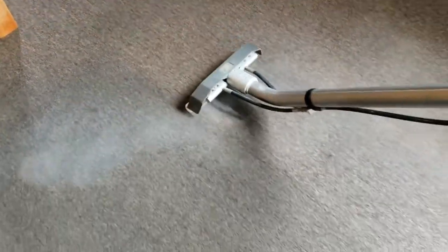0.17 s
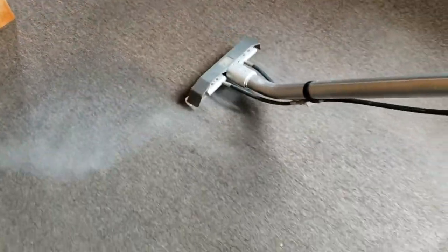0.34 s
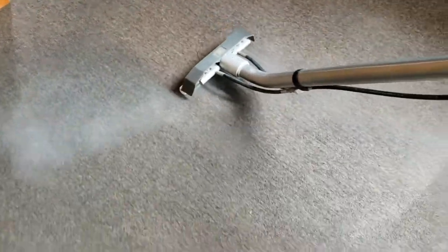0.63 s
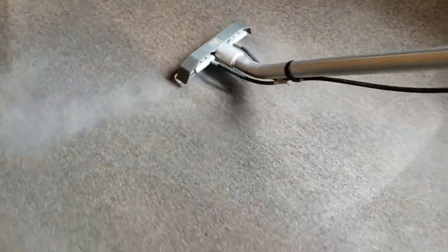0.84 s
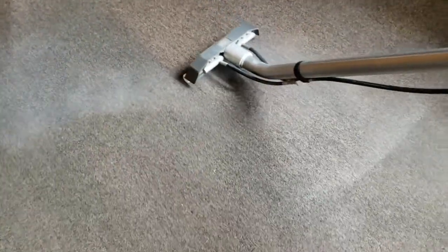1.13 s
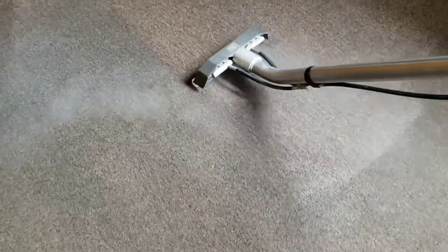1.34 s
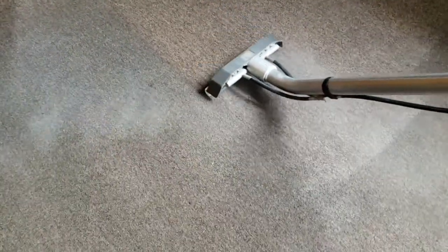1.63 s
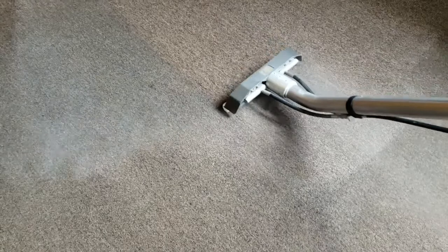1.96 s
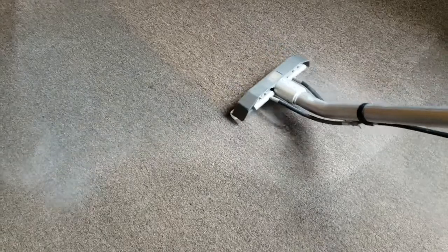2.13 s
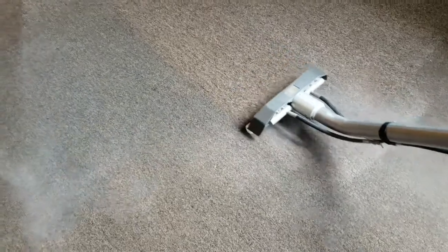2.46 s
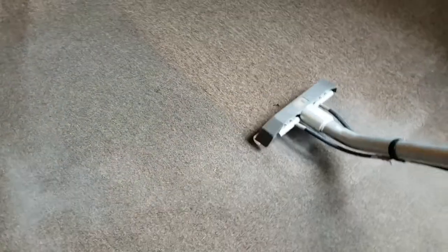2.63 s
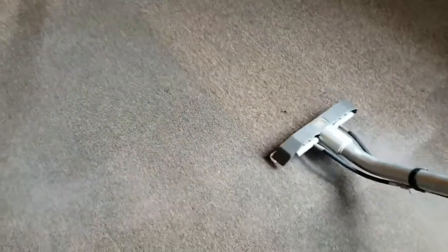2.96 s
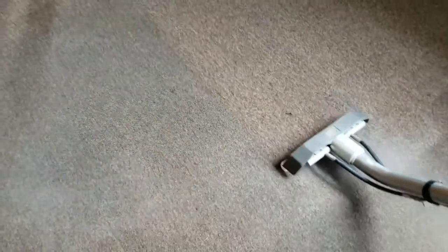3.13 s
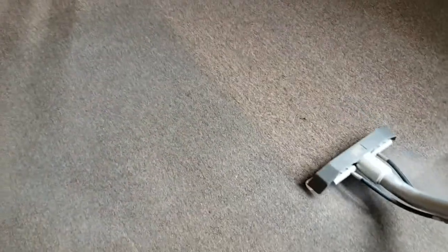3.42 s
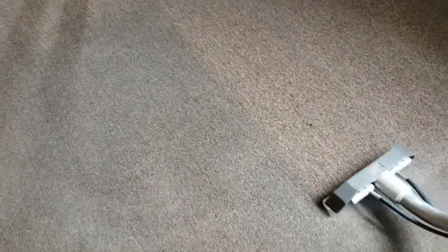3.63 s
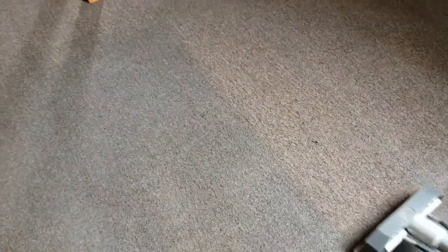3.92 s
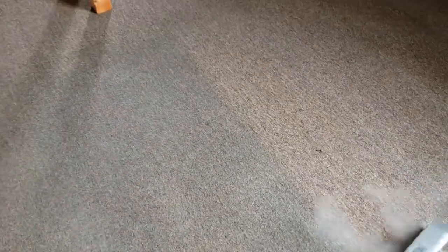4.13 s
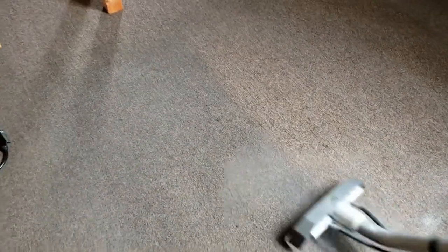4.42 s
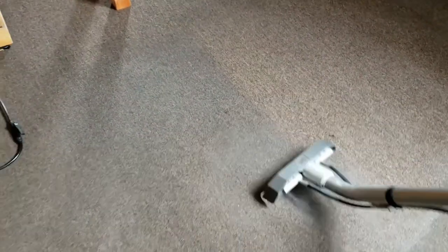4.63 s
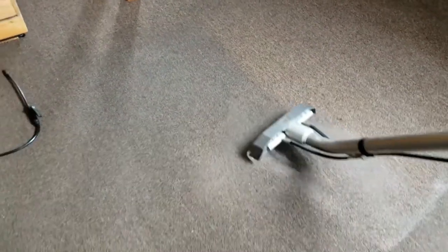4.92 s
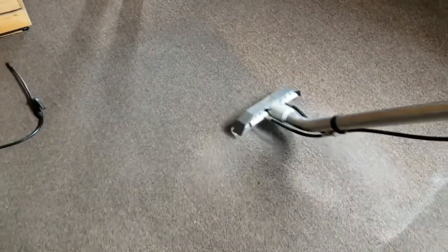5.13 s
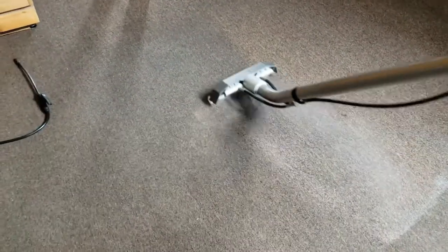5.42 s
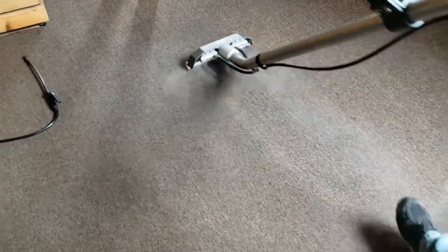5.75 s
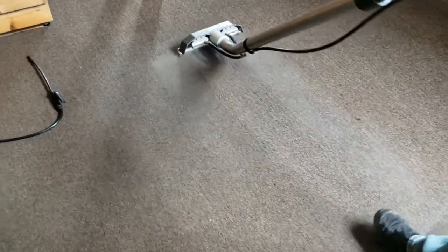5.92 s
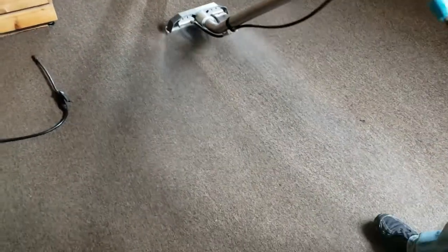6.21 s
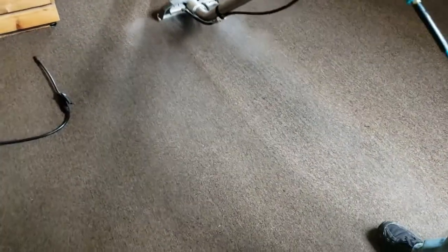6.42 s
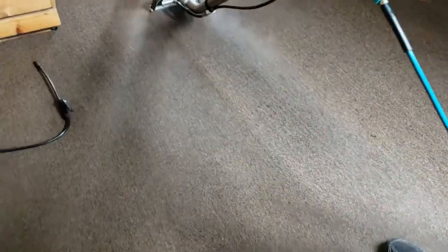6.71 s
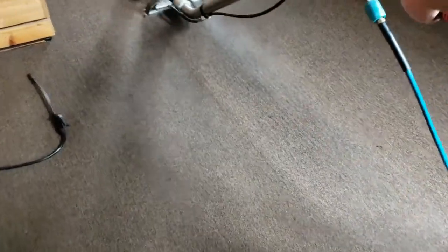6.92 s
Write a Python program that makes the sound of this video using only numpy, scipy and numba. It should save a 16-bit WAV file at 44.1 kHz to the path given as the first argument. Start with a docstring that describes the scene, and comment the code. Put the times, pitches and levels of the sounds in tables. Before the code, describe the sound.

In a carpeted room, close to a handheld stereo microphone, a hot-water extraction wand gives a continuous airy suction roar, with crisp jet hiss and very fine high sizzle wavering slightly on top. Beneath lies a low steady hum from a distant engine and vacuum blower, fullest around 2 to 4 s. The hiss leans left and its tone slides gently as the microphone turns. At about 3.9 s the rush dips, the seal breaks with a soft bump, and a hollow whoosh of gulped air swells until 4.26 s, when the head lands with a strong dull thump, wet slaps and smaller bumps up to 4.35 s. The hum settles slightly higher and the spray resumes thinner and quieter. Around 6 to 6.5 s a faint low growling judder shakes the floor. Near 6.9 s come a tiny gulp, a small metallic tick and two soft thumps; the rush continues to the end at about 7.1 s.

```python
"""In a carpeted room a hot-water extraction wand is drawn over the pile below a hand-held phone.
Air roars through the pile and jets hiss, both as coloured noise; twice the slot lifts, gulps air and thumps down.
Thumps and ticks are decaying modes; a late judder is a low row of harmonics, as is the hum of a far engine
and its vacuum blower. As the phone turns, moving echoes and bands shade the wand at two microphone ports."""
import sys
import numpy as np
from scipy import signal
from scipy.fft import rfft, irfft
from scipy.io import wavfile
from scipy.ndimage import uniform_filter1d, map_coordinates
from numba import njit

SR = 44100
rng = np.random.default_rng(int(sys.argv[2]) if len(sys.argv) > 2 else 0)


def to_wav(sig):
    """Store sig (one row per channel, or 1-D mono) as 16-bit WAV at the path in sys.argv[1].

    Samples outside -1..1 are clipped; the rate is SR.
    """
    pcm = np.clip(np.atleast_2d(sig), -1, 1) * 32767
    pcm = np.round(pcm).astype(np.int16)
    wavfile.write(sys.argv[1], SR, pcm.T)  # frames by channels


N = 312228
TIME = np.arange(N) / SR  # s

# Water jets striking the wet pile, loud on the pull and softer on the push.
# Each row: time in seconds, hiss level in dB, left minus right in dB.
JETS = [(0, -37.5, -2.5), (.65, -36, 2), (1.8, -35, 4.5), (2.45, -36.5, 4.5), (2.8, -36.5, 12.5),
        (3.8, -39, 15.5), (4.12, -38, 14), (4.22, -42.5, 19), (4.7, -43, 17.5), (5.6, -41.5, 9.5),
        (6.31, -43, 10), (6.55, -41, 7), (6.72, -43, 6), (6.98, -45.5, 5), (7.08, -41, 7)]
# The slot presses down, breaks its seal, gulps air and lands.
# Each row: pressed, in seconds, hush in dB, seal breaks, wide open and lands, in seconds, gulp level in dB,
# change of the mist in dB, lowest frequency of the roar in Hz, gain of its treble in dB.
LIFTS = [(3.9, -5.5, 3.94, 4.126, 4.265, -28, -0.5, 120, 0.5),
         (6.81, -2, 6.88, 6.9, 6.92, -35.5, -5, 520, -3)]
LET_GO_S = 0.069  # release of the hush and of the open slot's whine


def undb(db):
    """Amplitude ratio of a level: 20 dB is a factor of ten."""
    return 10 ** (np.asarray(db) / 20)


def both(pan_db):
    """Level difference between the ports (left minus right, dB), split evenly into two gains."""
    return undb(np.array([pan_db, -pan_db]) / 2)


def columns(rows):
    """Linear interpolation in time: every column after the first, one value per sample."""
    seconds, *rest = np.transpose(rows)
    return [np.interp(TIME, seconds, column) for column in rest]


def along(points, edge=None):
    """Interpolation in log frequency: a (Hz, value) table at every bin, with edge outside it if given."""
    hz, value = np.transpose(points)
    bins_hz = np.fft.rfftfreq(N, 1 / SR)
    return np.interp(np.log(bins_hz + 1), np.log(hz), value, edge, edge)


def ramp(starts, full, eases, stops):
    """Linear attack, hold and release between 0 and 1."""
    return np.interp(TIME, [starts, full, eases, stops], [0, 1, 1, 0])


def walk(rate):
    """Slow random modulation: levels held for 1 / rate s and smoothed twice; spread near 1."""
    held = int(SR / rate)
    steps = np.repeat(rng.standard_normal(N // held + 1), held)
    return 1.23 * uniform_filter1d(uniform_filter1d(steps, held), held)[:N]


def rush(colour, lag, pan=((100, 0), (200, 0))):
    """Partly coherent turbulence: a shared noise, late by lag samples at the left port, plus noise of each port's own."""
    # How alike the ports are. Each row: frequency in Hz, shared fraction of the power.
    likeness = [(60, .99), (130, 0.94), (290, 0.91), (550, 0.77), (1000, 0.53), (2000, 0.36), (4000, 0.33),
                (6500, 0.39), (9000, 0.14), (15000, 0.14)]
    share = along(likeness)
    gain = undb(along(colour, -80))
    shared, left, right = rfft(rng.standard_normal((3, N))) * gain
    common = irfft(shared * np.sqrt(share), N)
    late = map_coordinates(common, [np.arange(N) - lag], order=3, mode="nearest")
    own = irfft(np.array([left, right]) * np.sqrt(1 - share), N)
    pair = irfft(rfft(np.array([late, common]) + own) * both(along(pan)), N)
    return pair / np.sqrt(np.mean(pair.mean(axis=0) ** 2))  # the mean of the ports has rms 1


def hush():
    """Flow choked by contact: level change in dB as the wand is pressed into the pile before each lift."""
    press_s = 0.11
    return sum(db * ramp(s - press_s, s, s, s + LET_GO_S) for s, db, *_ in LIFTS)


def suction(lag):
    """Broadband turbulence of air dragged through the wet pile into the slot."""
    # Air flow. Each row: time in seconds, body level in dB, upper level in dB, upper left minus right in dB.
    airflow = [(0, -38, -42.5, 3), (1, -36.5, -40.5, 6), (2.2, -37, -40, 2), (3, -37, -40.5, 2.5),
               (3.65, -37.5, -41, 0.5), (4.4, -38, -41.5, -1.5), (4.9, -38.5, -43, 0.5),
               (6, -36.5, -44, 1.5), (6.45, -39, -43.5, 1.5), (6.7, -35.5, -40.5, 3), (7.08, -36, -42.5, 2)]
    # Spectrum of the body. Each row: frequency in Hz, relative density in dB per Hz.
    pile_colour = [(21, -38), (35, -17), (68, -6), (80, -8), (97, -6.5), (115, -11.5), (142, -10),
                   (178, -9), (215, -9), (236, -14.5), (269, -10.5), (335, -12), (385, -14), (449, -11.5),
                   (535, -14), (610, -11.5), (740, -8.5), (930, -10), (1150, -10.5), (1560, -12),
                   (2460, -10), (3200, -20.5), (4160, -59), (7040, -120)]
    # Spectrum of the upper part. Each row: frequency in Hz, relative density in dB per Hz.
    upper_colour = [(2300, -11), (2900, -2.5), (3700, -2), (4400, -2), (5200, -11), (6500, -19),
                    (7500, -28)]
    body_db, upper_db, upper_pan_db = columns(airflow)
    body = rush(pile_colour, lag) * undb(body_db + hush() + 0.61 * walk(9))
    # the upper part hushes more
    upper = rush(upper_colour, lag) * undb(upper_db + 1.5 * hush() + 0.81 * walk(10))
    return body + upper * both(upper_pan_db)


def jets(lag):
    """Impact noise: many droplets striking the pile merge into a steady hiss."""
    # Spectrum of the hiss. Each row: frequency in Hz, relative density in dB per Hz.
    splash_colour = [(3900, -5), (4450, -4), (4850, 2.5), (5800, 3), (6900, 3), (7400, 1), (8000, -30)]
    db, pan_db = columns(JETS)
    level_db = db + 0.75 * hush() + 0.66 * walk(22.06)
    return rush(splash_colour, lag) * undb(level_db) * both(pan_db)


def mist(lag, jets_pan_db):
    """High-frequency noise of the finest spray, in three bands; the ports all but miss the lowest."""
    # Fine mist. Each row: time in seconds, sizzle level in dB, top level in dB, left minus right in dB.
    spray_levels = [(0, -41, -40, 0.5), (.75, -43.5, -41, -1.5), (1.48, -39, -40, 1),
                    (2.29, -37.5, -42, 0.5), (2.7, -41, -39, -1.5), (3.31, -39.5, -43, 0),
                    (3.57, -41, -44, 1), (3.77, -39.5, -40, 4), (4.2, -41, -44, 2), (4.35, -42, -47, 1),
                    (4.6, -43.5, -45, 2), (4.87, -45.5, -44, 3), (5.1, -44.5, -43, 3), (5.38, -44, -42, 3),
                    (5.66, -41.5, -42, 4), (6.03, -43, -43, 3), (6.39, -45, -47, 3.5), (6.74, -46, -44, 5),
                    (7.08, -45, -39, -4)]
    # Spectra of the three bands. Each row: frequency in Hz, relative density in dB per Hz.
    faint_colour = [(7000, -13), (7600, 8), (8500, 3), (9600, 4.5), (10400, -22)]
    # Each row: frequency in Hz, relative density in dB per Hz.
    sizzle_colour = [(9000, -9), (10200, 0), (11500, 2.5), (12800, 1), (13800, -2)]
    # Each row: frequency in Hz, relative density in dB per Hz.
    top_colour = [(12500, -3), (13500, -2), (14800, 5), (15700, 2), (16500, -12)]
    fade_s = 0.063
    faint_db, top_pan_db = -9.5, -1  # relative to the sizzle

    sizzle_db, top_db, pan_db = columns(spray_levels)
    thins_db = 0
    for pressed, _, _, _, lands, _, change_db, *_ in LIFTS:
        thins_db = thins_db + change_db * ramp(pressed - fade_s, pressed, lands, lands + fade_s)
    sputter_db = thins_db + 0.54 * walk(16)

    # the faint band thins more than the other two
    faint = rush(faint_colour, lag) * undb(sizzle_db + faint_db + 0.7 * thins_db + sputter_db)
    sizzle = rush(sizzle_colour, lag) * undb(sizzle_db + sputter_db + 0.5 * walk(13))
    top = rush(top_colour, lag) * undb(top_db + sputter_db + 0.78 * walk(13))
    out = faint * both(0.38 * jets_pan_db + 9.0)
    return out + sizzle * both(pan_db) + top * both(pan_db + top_pan_db)


def gulps(lag):
    """Resonant inflow: with its seal broken the slot roars like a short open pipe."""
    # Spectrum of the roar. Each row: frequency in Hz, relative density in dB per Hz.
    slot_colour = [(71, -48), (120, -23), (156, -16), (292, -3), (375, -3.5), (412, -4.5), (481, -8.5),
                   (690, -3.5), (760, -2.5), (900, 0), (1030, -3), (1130, -6.5), (1300, -6.5), (1550, -13),
                   (2070, -7), (2350, -12.5), (2900, -12), (5000, -16.5), (6500, -64), (11000, -120)]
    # Side of the roar. Each row: frequency in Hz, left minus right in dB.
    slot_pan = [(2000, 0), (3500, -10), (5000, -3)]
    slit_hz, slit_haste = 1330, 0.45  # treble above this whistles in while the gap is still narrow
    fall_db_s = 214
    leak_db, leak_fall_db_s = -8, 35  # air still leaks in while the pile closes round the slot

    roar = rush(slot_colour, lag, slot_pan)
    treble = signal.sosfilt(signal.butter(2, slit_hz, "high", fs=SR, output="sos"), roar)
    body = signal.sosfilt(signal.butter(2, slit_hz, fs=SR, output="sos"), roar)
    out = 0
    for _, _, breaks, wide, lands, db, _, low_hz, treble_db in LIFTS:
        gap = np.clip((TIME - breaks) / (wide - breaks), 0, 1)
        deep = signal.sosfilt(signal.butter(2, low_hz, "high", fs=SR, output="sos"), body)
        # the minus sign avoids a notch where the two bands cross
        air = gap * deep - gap ** slit_haste * treble * undb(treble_db)
        since = np.maximum(TIME - lands, 0)
        fall_db = np.maximum(-fall_db_s * since, leak_db - leak_fall_db_s * since)
        out = out + air * undb(db + fall_db)
    return out * undb(0.55 * walk(27.0))


def slaps(lag):
    """Short wide noise bursts: water slaps out from under the slot as it lands."""
    # Each row: time in seconds (the burst peaks 5 ms later), level in dB.
    water_slaps = [(4.257, -30), (4.286, -32)]
    burst = sum(undb(db) * np.exp(-np.abs(TIME - s - .005) / 0.0081) for s, db in water_slaps)
    return rush([(1500, -21), (3000, 6), (7000, 2), (8200, -14)], lag, [(3000, 1), (6000, 9)]) * burst


def thumps():
    """Modal response: a short soft push rings the floor under the carpet."""
    # The wand meets the floor. Each row: start in seconds, peak level in dB, contact in milliseconds.
    landings = [(3.936, -28.5, 3.), (4.2609, -10.3, 1.5), (4.2925, -18.5, 5.), (4.327, -26, 4.),
                (4.347, -26, 6.), (6.925, -27, 1.5), (6.946, -26, 1.5)]
    # Modes of the floor. Each row: frequency in Hz, relative level in dB, 60 dB decay time in seconds.
    floor_modes = [(55, -17.5, .25), (103, -7.5, .048), (245, 0, .02), (370, -20, .05)]
    t = TIME[:SR // 2]
    modes = [undb(db) * np.sin(2 * np.pi * hz * t) * 1000 ** (-t / t60) for hz, db, t60 in floor_modes]
    # the pile pushes back first, the boards below (first two modes) swing the other way
    ring = sum(modes[2:]) - sum(modes[:2])
    out = np.zeros(N + SR)
    for s, db, ms in landings:
        push = np.hanning(int(ms * SR / 1000))
        blow = np.convolve(ring, push)[:len(t)]
        start = int(s * SR)
        out[start:start + len(t)] += undb(db) * blow / np.abs(blow).max()
    return out[:N]


def ticks():
    """Struck-metal modes: the lip of the slot takes a small hard knock on the pile and rings."""
    # Each row: time in seconds, peak level in dB.
    knocks = [(6.8945, -22)]
    # Modes of the lip. Each row: frequency in Hz, relative level in dB, 60 dB decay time in seconds.
    lip_modes = [(810, -1, 0.078), (960, 0, .06), (2040, -6, .03)]
    out = 0
    for s, db in knocks:
        t = np.maximum(TIME - s, 0)
        ring = sum(undb(own_db) * np.sin(2 * np.pi * hz * t) * 1000 ** (-t / t60)
                   for hz, own_db, t60 in lip_modes)
        out = out + undb(db) * ring / np.abs(ring).max()
    return out


def judder():
    """Stick-slip: the pushed wand slips unevenly on the pile and shakes the floor in a low growl."""
    # Harmonics of the slip rate. Each row: order, relative level in dB.
    harmonics = [(2, 0), (3, -7), (4, -11), (5, -15)]
    starts, full, eases, stops = 5.98, 6.12, 6.35, 6.5  # s
    slip_hz, sag_hz_s, level_db = 30.6, 9.5, -36  # the slips slow a little
    hz = np.maximum(slip_hz - sag_hz_s * (TIME - starts), 1)
    turn = 2 * np.pi * np.cumsum(hz * (1 + 0.01204 * walk(35))) / SR
    growl = sum(undb(own_db + .8 * walk(15)) * np.sin(order * turn) for order, own_db in harmonics)
    return np.sqrt(2) * undb(level_db) * growl * ramp(starts, full, eases, stops)


def shaft(sealed_hz, open_hz, settle_s):
    """Exponential relaxation: after the first lift a shaft's speed settles at a higher value."""
    rises_s = 4.3
    return open_hz - (open_hz - sealed_hz) * np.exp(-np.maximum(TIME - rises_s, 0) / settle_s)


def stack(hz, db, place, orders):
    """Harmonic orders of one shaft; each wavers alone on its long way through hose and doorway."""
    whine_db, whine_hz = 4, 500  # the open slot lets out the orders above this
    turn = 2 * np.pi * np.cumsum(hz * (1 + .0004 * walk(3))) / SR
    _, _, breaks, wide, lands, *_ = LIFTS[0]
    open_db = whine_db * ramp(breaks, wide, lands, lands + LET_GO_S)
    out = 0
    for order, *by_place_db in orders:
        # steady up to place 1, then the hum breaks up towards place 2
        waver_db = np.interp(place, np.arange(3), [.25, .25, 2.8]) * walk(4)
        place_db = np.interp(place, np.arange(3), by_place_db)
        own_db = db + place_db + waver_db + open_db * (order * hz > whine_hz)
        # the room hands short waves to the two ports a little out of step (phase in radians)
        skew = order * hz * 0.00066 * rng.choice([-1, 1]) * np.array([[1], [-1]])
        phase = order * turn + 2 * np.pi * rng.random() + skew
        out = out + np.sqrt(2) * undb(own_db) * np.sin(phase)
    return out


def machine():
    """Rotating-machine tones of an engine and its blower; standing waves colour them by place."""
    # Hum at the phone. Each row: time in seconds, engine level in dB, blower level in dB,
    # place of the phone along the stroke (0 to 2, held at 2 beyond).
    hum_levels = [(0, -41, -43.5, .09), (.6, -36.5, -39.5, .14), (2.1, -35, -35, 1.07),
                  (2.6, -33.5, -37.5, 0.96), (3.9, -37.5, -38, 0.93), (4.15, -36.5, -37, 1.5),
                  (4.3, -38, -41, 1.88), (4.45, -37, -41, 1.7), (4.85, -42, -44, 1.76),
                  (5, -47.5, -43.5, 2.7), (5.8, -41, -43.5, 1.63), (6.05, -42, -48.5, 1.87),
                  (6.4, -44.5, -44, 2.05), (6.6, -40, -43.5, 1.7), (7.08, -43, -42.5, 1.9)]
    # Engine tones. Each row: order of the shaft, relative level in dB at places 0, 1 and 2.
    engine_orders = [(2, -30, -29, -17), (3, -12, -21, -6.5), (5, -0.5, -2, -1), (6, -24, -28, -4.5),
                     (8, -21, -32, -11), (9, -22, -23.5, -15), (10, -10.5, -25, -29), (11, -32, -26, -5),
                     (13, -31, -35, -26), (15, -43, -20.5, -14), (16, -36, -28.5, -24),
                     (18, -20, -21.5, -15), (24, -19.5, -16, -16), (31, -12.5, -38, -15),
                     (48, -12.5, -17, -10)]
    # Blower tones. Each row: order of the shaft, relative level in dB at places 0, 1 and 2.
    blower_orders = [(1, -20, -15, 0), (2, 2.5, -2, -2), (4, -16.5, -12.5, -3.5), (6, -35, -36, -14.5)]
    engine_db, blower_db, place = columns(hum_levels)
    engine_hz = shaft(sealed_hz=18.97, open_hz=19.4, settle_s=1.2)
    blower_hz = shaft(sealed_hz=64.96, open_hz=66.4, settle_s=.35)
    return stack(engine_hz, engine_db, place, engine_orders) + stack(blower_hz, blower_db, place, blower_orders)


def flutter():
    """Narrow-band low noise, nearly coherent at the ports: a steady throb that swells as the slot lifts."""
    steady_db, gust_peak_db, gust_s = -52.5, -39, 4.02
    rise_db_s, fall_db_s = 200, 90
    gust_db = gust_peak_db - np.maximum(rise_db_s * (gust_s - TIME), fall_db_s * (TIME - gust_s))
    throb = rush([(25, -45), (38, -14), (48, -10), (55, 4), (63, 4), (70, -14), (95, -12), (130, -25)], 0)
    return throb * (undb(steady_db) + undb(gust_db))


@njit
def svf(x, hz, width):
    """State-variable band-pass with a moving centre and unit gain there."""
    y, band, low = np.empty(len(x)), 0., 0.
    for i in range(len(x)):
        g, damping = np.tan(np.pi * hz[i] / SR), width / hz[i]
        v = (band + g * (x[i] - low)) / (1 + g * (g + damping))
        band, low, y[i] = 2 * v - band, low + 2 * g * v, damping * v
    return y


def ports(sound):
    """Comb filtering and diffraction: each port hears two moving reflections and its own sliding bands."""
    # The hand around the phone reflects treble into each port. Each row: time in seconds,
    # left delay in samples, left share, right delay in samples, right share.
    hand = [(0, 25, .25, 11.3, -.75), (.7, 25.3, .45, 11.2, -.75), (2.3, 25.6, .5, 11, -.75),
            (2.62, 28, .55, 11, -.75), (2.75, 27.2, .3, 14, .2), (3.75, 22.6, 0, 15, .35),
            (4.0, 23.5, 0, 13, 0), (5.7, 28.5, .2, 9.5, -.15), (6.4, 24, .2, 9, -.1),
            (6.6, 20, .4, 8.5, -.5), (7.08, 19.5, .4, 8, -.4)]
    # Fingers further off send a later reflection. Each row: time in seconds,
    # left delay in samples, left share, right delay in samples, right share.
    fingers = [(0, 47, 0.61, 28.5, 0.98), (.95, 36, 0.57, 26.5, 0.5), (1.05, 50, 0.3, 30, 0.52),
               (1.2, 33, 0.24, 25.4, 0.71), (2.2, 39, 0.2, 26, 0.36), (2.55, 37, .8, 31, 0.49),
               (2.75, 34, 0.88, 23, 0), (3.0, 35, 0.98, 32, 0.77), (3.4, 28, 0.52, 34, 0.5),
               (3.75, 29, 0.44, 29, .7), (4.0, 31, 0.51, 30, 0.99), (4.35, 26, 0.29, 26.6, 0.45),
               (4.85, 29, 0.064, 35, 0.39), (5.15, 31, 0.07, 22, 0.11), (5.85, 41, 0.64, 40, 0.032),
               (6.1, 39, 0, 29, 0), (7.08, 34, 0.07, 31, 0)]
    # What the hand reflects, before the shares. Each row: frequency in Hz, gain in dB.
    palm = [(900, -15.5), (2500, -12), (6000, -13), (7500, -18), (9500, -20), (16000, -32)]
    # Sliding bright band. Each row: time in seconds, left Hz, left lift, right Hz, right lift.
    # A lift is the added share of the band, limited below to -0.75 and above to 2.
    sheen = [(0, 10200, 0, 15300, .6), (1, 10500, 0.76, 15400, .88), (2.4, 11200, 0.41, 15000, .23),
             (2.8, 10400, 0.43, 7500, .1), (3.4, 11400, 1, 8300, 0.67), (3.85, 12500, .05, 9600, 0.51),
             (4.3, 13000, 0.15, 12600, .1), (4.85, 15100, .3, 12500, .59), (5.3, 14000, 1.2, 12000, .3),
             (6.15, 12300, 0.038, 13500, .1), (7.08, 12320, .22, 12800, 1)]
    # Sliding, mostly dull band. Each row: time in seconds, left Hz, left lift, right Hz, right lift.
    hollow = [(0, 8850, -0.25, 6950, -0.82), (2.2, 9000, -0.41, 7560, -1), (2.6, 7200, -0.47, 8800, -0.4),
              (3.6, 8360, -0.69, 10000, 0.25), (4.2, 8550, -0.76, 7800, 0.12),
              (4.8, 8500, -0.53, 9500, 0.029), (5.4, 7600, -0.48, 9300, -.6),
              (6.2, 7200, -0.28, 7800, -0.55), (6.6, 5800, -0.55, 7100, -0.75),
              (6.9, 5700, -0.45, 7800, -.5), (7.08, 5900, -0.24, 8500, -.3)]
    # Lower band, dulled or brightened. Each row: time in seconds, left Hz, left lift, right Hz, right lift.
    shade = [(0, 2090, -0.39, 4100, -0.39), (1, 2100, -0.35, 4140, -0.35), (2.2, 2100, -.1, 4000, -0.22),
             (2.5, 2200, -0.3, 3900, -.3), (2.85, 2240, -0.17, 2770, 0.37), (3.75, 2800, -0.18, 2980, 0.42),
             (4.0, 3200, 0, 3200, -0.03), (4.4, 4900, -.45, 2720, -0.005), (4.85, 4900, -.45, 2600, .15),
             (5.2, 4000, -0.39, 2500, 0.25), (5.7, 3600, 0.11, 2290, .2), (6.4, 3500, -0.092, 2200, 0.11),
             (6.6, 3500, -0.14, 2200, -0.15), (7.08, 3500, -0.058, 2200, 0.15)]
    reflections = columns(hand), columns(fingers)
    bands = (columns(sheen), 1900.), (columns(hollow), 1600.), (columns(shade), 900.)  # widths in Hz

    treble = irfft(rfft(sound) * undb(along(palm)), N)
    out = []
    for port in range(2):
        heard = sound[port]
        for curves in reflections:
            delay, share = curves[2 * port:2 * port + 2]
            echo = map_coordinates(treble[port], [np.arange(N) - delay], order=3, mode="nearest")
            heard = heard + share * echo
        for curves, width_hz in bands:
            centre_hz, lift = curves[2 * port:2 * port + 2]
            heard = heard + np.clip(lift, -3 / 4, 2) * svf(heard, centre_hz, width_hz)
        out.append(heard)
    return np.array(out)


def scene():
    """Superposition: the wand passes the shading of the ports, the other sources add directly."""
    # Where the phone points. Each row: time in seconds, lag of the left port in samples.
    bearing = [(0, -1), (2.3, 2.2), (3.2, 5), (4.1, 7), (4.33, 7), (4.45, 3.5), (5.8, -1), (7.08, -4)]
    lag = columns(bearing)[0]
    pulse_db = 0.58 * walk(18)  # the water pressure wavers for jets and mist alike
    spray = jets(lag) * undb(pulse_db / 3) + mist(lag, columns(JETS)[1]) * undb(pulse_db)
    wand = suction(lag) + spray + gulps(lag) + slaps(lag)
    solid = thumps() + ticks() + judder() + machine()
    return ports(wand) + solid * both(-0.46)[:, None] + flutter()


def record(dry):
    """Band limiting: the phone rolls off the deepest bass and cuts the top."""
    bottom_hz, top_hz = 36, 15850
    thin = signal.sosfilt(signal.butter(2, bottom_hz, "high", fs=SR, output="sos"), dry)
    return signal.sosfilt(signal.ellip(10, .2, 70, top_hz, fs=SR, output="sos"), thin)


dry = scene()
out = record(dry)
to_wav(out)
```